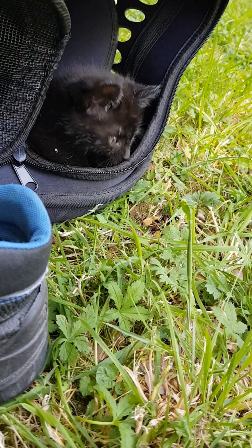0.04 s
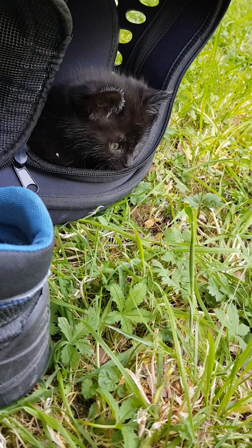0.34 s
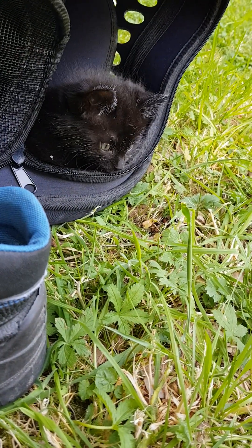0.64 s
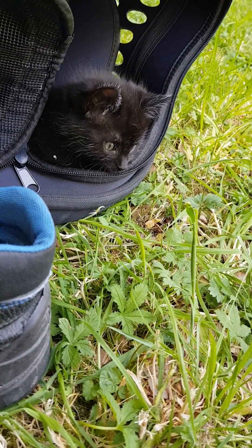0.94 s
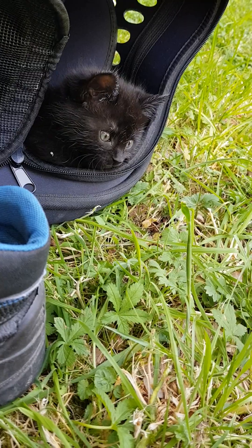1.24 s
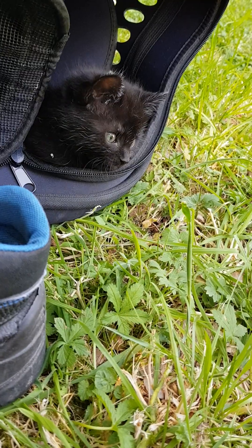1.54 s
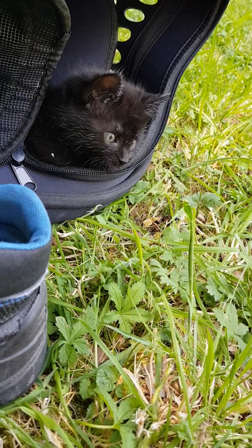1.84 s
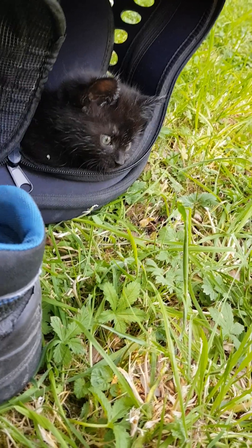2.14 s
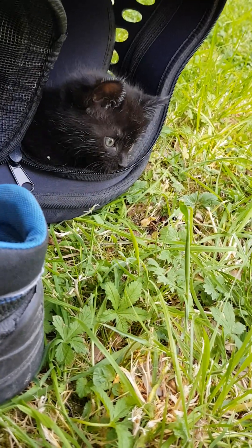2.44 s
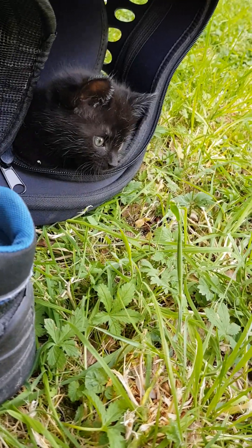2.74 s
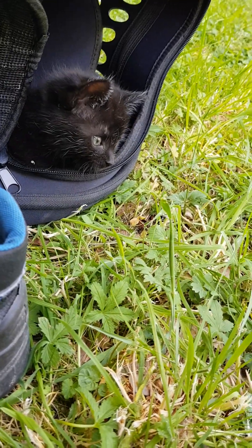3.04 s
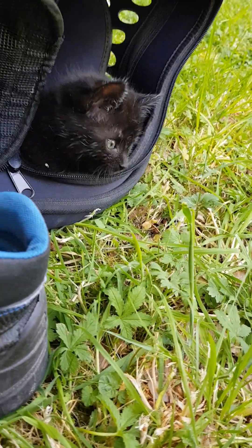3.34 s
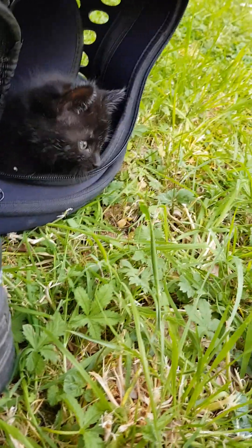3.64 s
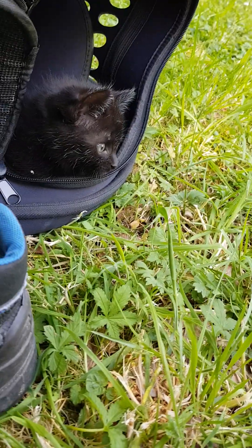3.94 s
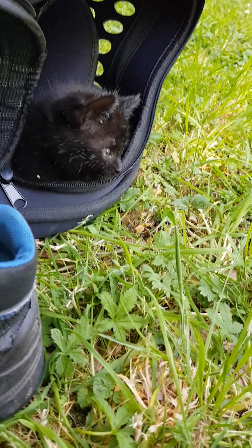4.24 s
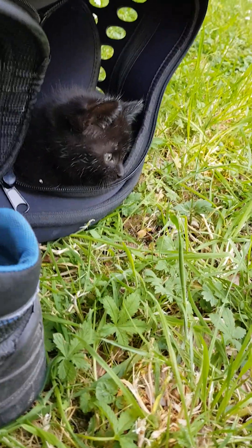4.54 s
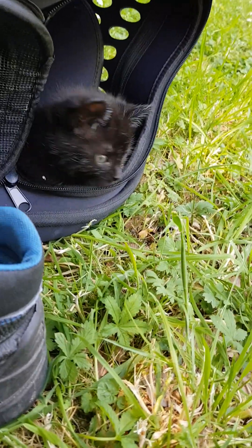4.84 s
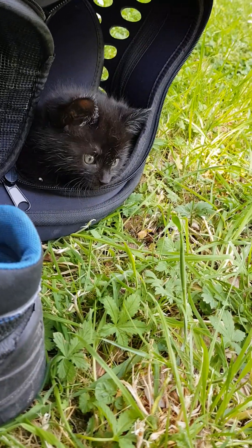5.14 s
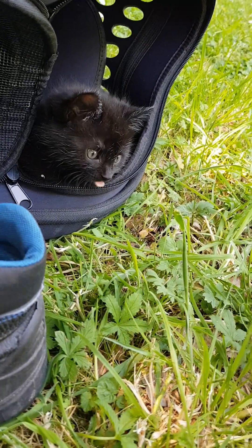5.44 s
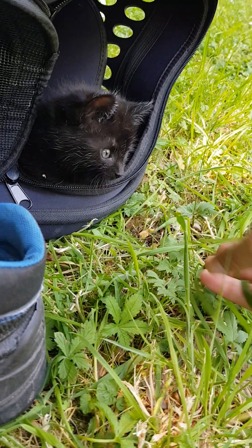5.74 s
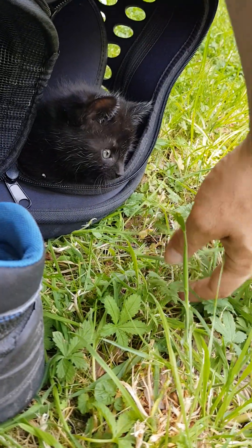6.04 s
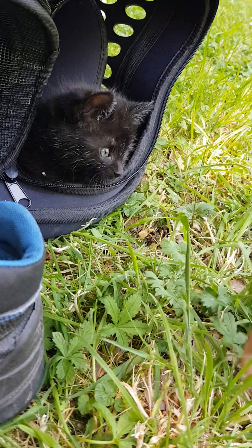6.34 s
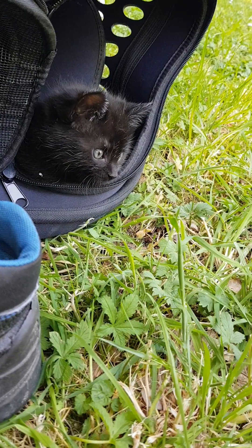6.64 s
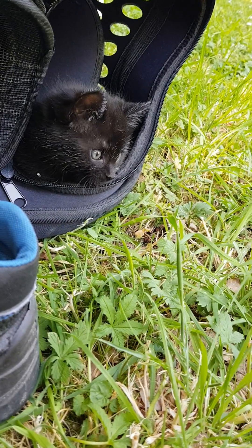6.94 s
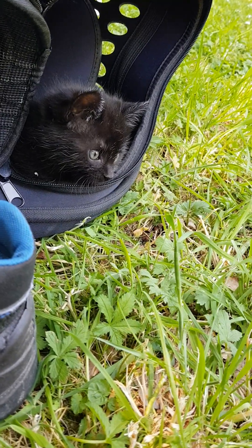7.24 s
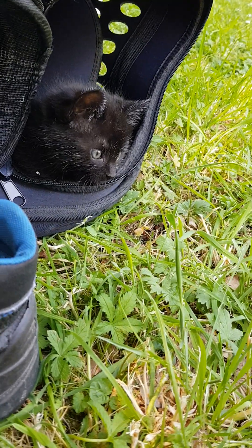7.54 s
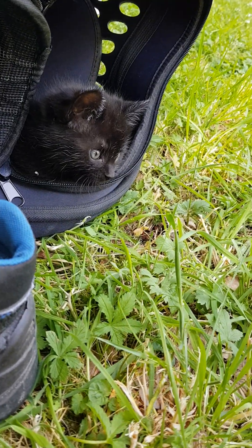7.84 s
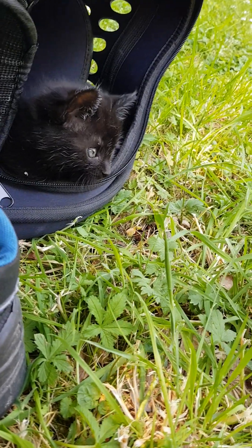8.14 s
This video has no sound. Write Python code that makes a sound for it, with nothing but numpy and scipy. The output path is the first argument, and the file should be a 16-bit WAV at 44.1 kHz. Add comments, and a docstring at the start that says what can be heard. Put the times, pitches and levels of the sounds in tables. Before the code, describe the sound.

Outdoors, a quiet low rumble runs steadily, with an engine idling far away and a light hum. Close to the microphone, mostly on the left, fingers rustle and scrape softly on the phone, with a few dull bumps and small taps. A bird chirps very faintly in the distance. At the end the grip shifts and the case creaks in a quick run of sharper clicks.

```python
"""An engine idles far off across a lawn, heard as the low harmonics of its firing cycle.
Close by, fingers on a hand-held phone rustle and scrape by stick-slip friction near the left
microphone port. Taps ring the case, the hand bumps it, and at the end the grip shifts and the
case creaks in a quick run of clicks. A faint bird sings, its notes scattered by trees, over
mains hum, outdoor rumble, stirring air and microphone hiss."""
import sys
import numpy as np
from scipy import signal
from scipy.fft import rfft, irfft, next_fast_len
from scipy.io import wavfile
from scipy.ndimage import uniform_filter1d

SR = 44100
rng = np.random.default_rng(int(sys.argv[2]) if len(sys.argv) > 2 else 0)


def store_wav(level_fs):
    """Save 16-bit WAV to argv[1]."""
    pcm = np.round(np.clip(np.atleast_2d(level_fs), -1, 1) * 32767)
    wavfile.write(sys.argv[1], SR, pcm.T.astype(np.int16))


N = 370881
T = np.arange(N) / SR

# Levels in the tables are relative; each source applies its own gains.
# Engine harmonics. Each row: multiple of the cycle rate, level in dB.
ENGINE_HARMONICS = [(4, -2.5), (5, -30.5), (6, -0.5), (9, -20), (10, -22), (12, -16), (14, -36.5),
                    (15, -31.5), (16, -30), (18, -27.5)]
# How loudly the engine carries. Each row: time in seconds, level in dB.
ENGINE_LEVEL = [(0.0, -47.5), (1.71, -48), (2.32, -41), (2.67, -40), (3.35, -49), (3.93, -44), (4.5, -49),
                (5.83, -49.5), (6.21, -45.5), (7.61, -52), (7.94, -62), (8.41, -61)]
# Finger strokes. Each row: centre in seconds, fizz level in dB, length in seconds.
FINGER_STROKES = [(.067, -65.5, .07), (0.188, -64, .025), (.282, -69.5, 0.031), (1.104, -69.5, 0.041),
                  (1.463, -66, 0.064), (1.595, -63.5, .05), (1.678, -48, 0.0026), (1.69, -54.5, 0.038),
                  (1.77, -63, 0.069), (2.149, -58, 0.071), (2.397, -60.5, 0.041), (2.5, -63, 0.096),
                  (3.074, -57, 0.088), (3.845, -68, .12), (4.053, -54.5, 0.045), (4.274, -62, 0.19),
                  (4.546, -63, 0.072), (4.697, -55, 0.064), (4.89, -64.5, 0.2)]
# Friction spectra: skin fizz, stroke body, scrape. Each row: frequency in Hz, density in dB.
FIZZ_SPECTRUM = [(3000, -55), (7600, -32), (9000, -10.5), (11500, -0.5), (14000, 3), (16000, -2.5)]
BODY_SPECTRUM = [(300, 1), (720, 2), (1200, -7), (2000, -5), (2800, -4.5), (3700, -10), (5000, -11),
                 (6300, -23), (8000, -53)]
SCRAPE_SPECTRUM = [(300, 4), (600, 2.5), (860, -2.5), (1040, -7), (1220, -3.5), (1550, -8), (2050, -1),
                   (2400, -5), (2800, -5), (3250, -18), (3900, -11), (4600, -28), (7000, -38)]
# Slides on the case. Each row: centre in seconds, level in dB, length in seconds, squeak in Hz,
# left minus right in dB.
CASE_SCRAPES = [(0.026, -55, 0.11, 1555, 16), (0.114, -60, 0.11, 1865, 26), (3.117, -55, 0.09, 1390, 39),
                (3.228, -57, 0.05, 1390, 25), (5.377, -58.5, 0.036, 1340, 20),
                (6.886, -73.5, 0.077, 1230, 20), (7.406, -72, 0.053, 1320, 22),
                (7.629, -63, 0.066, 1210, 22), (7.742, -70, 0.05, 1320, 22)]
# Fingertip taps. Each row: start in seconds, peak in dB.
FINGER_TAPS = [(3.16, -42), (3.204, -42), (5.348, -46), (5.370, -26.5), (6.613, -33), (6.839, -47),
               (7.596, -40.5)]
# Creaks. Each row: start in seconds, peak of the first slip in dB, length in seconds.
GRIP_CREAKS = [(8.1814, -29, .004), (8.1935, -20, .004), (8.208, -32.5, .012), (8.252, -28.5, .004),
               (8.281, -31.5, .028), (8.32, -33.5, .02), (8.37, -42.5, .02), (8.401, -40.5, .004)]
# Case modes. Each row: frequency in Hz, base bandwidth in Hz, left level in dB, right level in dB.
CASE_MODES = [(780, 86, 2, -14), (1033, 157, 2.5, -2.5), (1296, 164, 10.5, -32), (1590, 37, -25, -28),
              (2215, 245, 6.5, -3), (2790, 110, -4.5, -32), (3370, 21, -12, -28), (4240, 83, -7.5, -15),
              (5000, 180, -12, -21)]
# Bumps. Each row: centre in seconds, peak in dB, frequency in Hz, length in seconds,
# left minus right in dB.
HAND_BUMPS = [(2.987, -28.5, 55, 0.027, 24), (5.055, -33.5, 68, 0.027, 15), (5.095, -30, 51.3, 0.011, 22),
              (7.425, -29.5, 70, 0.014, -24), (7.68, -43.5, 75.3, 0.079, 4.5)]
# Song. Each row: centre in seconds, level in dB, length in seconds, pitch in Hz, trill from 0 to 1.
BIRD_NOTES = [(1.758, -68, .02, 4800, 0.7), (3.82, -77, 0.063, 4200, .6), (4.18, -75, 0.063, 5180, 0.6),
              (4.532, -73, 0.056, 3780, .6), (4.69, -67, .04, 2710, 0.48), (4.88, -74, 0.048, 4400, 0.74),
              (5.71, -70, .05, 2767, 0.11), (6.33, -73.5, 0.06, 3460, 0.07), (6.49, -73, 0.1, 3790, 0.7),
              (6.97, -72.5, 0.044, 2620, 0.93), (7.19, -72, 0.057, 3450, 0.3),
              (7.38, -69.5, 0.065, 3437, 0.6), (7.52, -72, 0.078, 2830, 0.8), (7.8, -82.5, 0.21, 4500, .5)]
# Hum partials. Each row: frequency in Hz, level in dB.
HUM_PARTIALS = [(100.1, -61.5), (150, -60.5), (200.1, -59.5), (250.1, -86.5)]
# Spectra of outdoor rumble, air at the ports and hiss. Each row: frequency in Hz, density in dB.
RUMBLE_SPECTRUM = [(15, -42.5), (28, -19.5), (45, 2), (75, -1), (115, -4), (170, -6.5), (230, -9.5),
                   (300, -14), (400, -27), (650, -37), (1200, -64)]
AIR_SPECTRUM = [(15, -18.5), (35, -7.5), (55, 7), (100, 1.5), (200, -15), (320, -20), (600, -31.5),
                (1200, -55)]
HISS_SPECTRUM = [(300, 4), (1000, 3), (2500, -0.5), (4500, -6.5), (7000, -15.5), (8500, -31), (10000, -4),
                 (12000, 2.5), (16000, 4)]
# Envelopes of the rumble and the cupped hand's resonance. Each row: time in seconds, level in dB.
RUMBLE_LEVEL = [(0.0, -58.5), (0.3, -60.5), (4.22, -56), (4.71, -58), (8.41, -56.5)]
HOLLOW_LEVEL = [(0, -68), (1.35, -76.5), (1.65, -81.5), (2.5, -71.5), (3.7, -80), (4.2, -77), (5.2, -70.5),
                (5.55, -82), (7.6, -71), (8.41, -95)]

FAR_PAN_DB = 1.8  # left minus right
GRIP_HZ = 5530  # contact cut-off as the grip starts to shift


def engine(cycle_hz=17.47, gain_db=2, flutter_db=1.02, beat_s=1.262, crest_s=2.53):
    """Periodic firing makes a harmonic series; only low harmonics carry far, and the eighth beats."""
    phase = 2 * np.pi * np.cumsum(cycle_hz * (1 + .002 * drift(1.492))) / SR

    def harmonic(k):
        """Phase dispersion spreads the harmonics in time, so their sum hardly throbs."""
        return np.sin(k * phase + np.pi * k ** 2 / 8 + .31 * drift(7))

    partials = sum(undb(db + flutter_db * drift(2.64)) * harmonic(k) for k, db in ENGINE_HARMONICS)
    beat = np.cos(2 * np.pi * (T - crest_s) / beat_s)
    eighth = undb(-52 + 4 * beat) * harmonic(8)
    return far(partials * undb(curve(ENGINE_LEVEL) + gain_db) + eighth)


def rustle(gain_db=-3, flicker_db=2, rest_fizz_db=-75, rest_body_db=-83, body_slope=.77):
    """Skin friction: dense micro-slips merge into noise; resting fingers fidget between strokes."""
    fidget = undb(3 * drift(8))
    fizz_power = (undb(rest_fizz_db) * fidget) ** 2
    body = undb(rest_body_db) * fidget
    for centre, db, length in FINGER_STROKES:
        stroke = bell(centre, length)
        fizz_power += (undb(db) * stroke) ** 2
        body += undb(-68.5 + body_slope * (db + 62)) * stroke  # grows more slowly than the fizz
    grain = slips(per_second=9000, spread_db=3.5)
    friction = np.sqrt(fizz_power) * colour(grain, FIZZ_SPECTRUM) + body * colour(grain, BODY_SPECTRUM)
    return friction * undb(gain_db + flicker_db * drift(70)) * pan(24)


def scrapes(grain_db=-4, jerk_db=1.5, squeak_db=-6):
    """Coarser stick-slip on the case drives a resonant squeak whose pitch depends on the grip."""
    grain = colour(slips(per_second=4000, spread_db=2.5), SCRAPE_SPECTRUM)
    grain *= undb(grain_db + jerk_db * drift(90))
    out = np.zeros((2, N))
    for centre, db, length, hz, left_db in CASE_SCRAPES:
        squeak = resonate(grain, hz, width_hz=120) * undb(squeak_db)
        out += (grain + squeak) * undb(db) * bell(centre, length) * pan(left_db)
    return out


def taps(cutoff_hz=1970, reference_db=-32.5, db_per_octave=27):
    """Impact: a fingertip excites and damps the case, brighter when firmer; a faint rattle follows."""
    hits = [(start, db, cutoff_hz * 2 ** ((db - reference_db) / db_per_octave))
            for start, db in FINGER_TAPS]
    ring = ring_case(hits, damping=1.83, thud_db=4.5, tick_db=-28, edge_db=-10, right_db=-5.5)
    return ring + undb(-11) * scatter(ring, t60=.37)


def creaks(slip_gap_s=.0075, slip_fade_db=-2, settled_hz=1440, settle_s=.035):
    """Stick-slip: runs of weakening slips ring the case freely, duller as the grip settles."""
    hits = []
    for start, db, length in GRIP_CREAKS:
        elapsed = start - GRIP_CREAKS[0][0]
        cutoff_hz = settled_hz + (GRIP_HZ - settled_hz) * np.exp(-elapsed / settle_s)
        for k, delay in enumerate(np.arange(0, length, slip_gap_s)):
            jitter = min(k, 1) * .0006 * rng.standard_normal()
            hits.append((min(start + delay + jitter, T[-1]), db + k * slip_fade_db, cutoff_hz))
    ring = ring_case(hits, damping=.74, thud_db=-11, tick_db=-25.5, edge_db=-15, right_db=-.5)
    return ring + undb(-12) * scatter(ring, t60=.3)


def ring_case(hits, damping, thud_db, tick_db, edge_db, right_db, null_hz=1760, null_width_hz=390):
    """Modal decay: each hit rings the case; soft contact weakens upper modes, hard contact ticks."""
    t = np.arange(SR // 16) / SR
    hz, width, left, right = np.transpose(CASE_MODES)
    gains = undb([left, right + right_db]) * width
    attack = 1 - np.exp(-t / .0005)
    decay = np.exp(-np.pi * np.outer(width * damping, t))
    skin = signal.butter(4, 10000, "high", fs=SR, output="sos")
    edge = signal.butter(4, [2500, 5200], "band", fs=SR, output="sos")  # a hard edge wakes upper modes
    null = signal.iirnotch(null_hz, null_hz / null_width_hz, fs=SR)  # the case hardly radiates here
    out = np.zeros((2, N + len(t)))
    for start, db, cutoff_hz in hits:
        detuned_hz = hz * (1 + .022 * rng.standard_normal(len(hz)))
        modes = attack * decay * np.cos(2 * np.pi * np.outer(detuned_hz, t))
        modes[0] *= undb(thud_db)
        radiated = signal.lfilter(*null, gains @ modes)
        contact = signal.butter(4, [350, np.clip(cutoff_hz, 600, 12000)], "band", fs=SR, output="sos")
        ring = signal.sosfilt(contact, radiated) + undb(edge_db) * signal.sosfilt(edge, radiated)
        ring[1] = np.roll(ring[1], SR // 10000)  # the right port is further from the fingers
        tick = signal.sosfilt(skin, rng.standard_normal(len(t))) * np.exp(-t / .0058)
        tick_gain = undb(tick_db) * (cutoff_hz / GRIP_HZ) ** 2 * pan(20)
        i = int(start * SR)
        out[:, i:i + len(t)] += undb(db) * (ring / np.abs(ring).max() + tick_gain * tick)
    return out[:, :N]


def bumps():
    """Forced motion: each nudge of the hand gives the phone a brief pulse of bass."""
    return sum(undb(db) * bell(centre, length) * np.cos(2 * np.pi * hz * (T - centre)) * pan(left_db)
               for centre, db, hz, length, left_db in HAND_BUMPS)


def bird(warble_depth=.06, fall_octaves_per_s=1.3):
    """Frequency modulation turns whistles into falling trills; scattering by trees blurs them."""
    song = np.zeros(N)
    warble = drift(350)
    for centre, db, length, pitch_hz, trill in BIRD_NOTES:
        note = np.abs(T - centre) < 2 * length
        glide = 2 ** (-trill * fall_octaves_per_s * (T[note] - centre))
        hz = pitch_hz * glide * (1 + trill * warble_depth * warble[note])
        song[note] += undb(db) * bell(centre, length)[note] * np.sin(2 * np.pi * np.cumsum(hz) / SR)
    return scatter(song, t60=.33) * pan(13)


def mains_hum(flutter_db=.9):
    """Alternating current hums near harmonics of 50 Hz, each wavering slightly in level."""
    partials = sum(undb(db + flutter_db * drift(2.275)) * np.sin(2 * np.pi * (hz * T + rng.random()))
                   for hz, db in HUM_PARTIALS)
    return far(np.sqrt(2) * partials)


def background(rumble_db=5, air_db=-56, hiss_db=-68, hollow_hz=640):
    """Rumble is coherent at both ports, air and hiss are not; the cupped hand resonates at the left."""
    rumble = colour(rng.standard_normal(N), RUMBLE_SPECTRUM) * undb(curve(RUMBLE_LEVEL) + rumble_db)
    air = colour(rng.standard_normal((2, N)), AIR_SPECTRUM) * undb(air_db)
    hiss = colour(rng.standard_normal((2, N)), HISS_SPECTRUM) * undb(hiss_db)
    cavity = resonate(rng.standard_normal(N), hollow_hz, width_hz=170)
    hollow = resonate(cavity, hollow_hz, width_hz=340) * undb(curve(HOLLOW_LEVEL))
    return far(rumble) + air * pan(3.2) + hiss * pan(FAR_PAN_DB) + hollow * pan(46)


def slips(per_second, spread_db):
    """A Poisson train of tiny slips, a few much stronger than the rest."""
    hit = rng.random(N) < per_second / SR
    sign = rng.choice([-1, 1], N)
    strength = undb(spread_db * np.minimum(rng.exponential(size=N), 4))
    return unit(hit * sign * strength)


def resonate(x, hz, width_hz):
    """A single resonance selects one band, at unit rms."""
    return unit(signal.lfilter(*signal.iirpeak(hz, hz / width_hz, fs=SR), x))


def scatter(x, t60):
    """Dense random echoes form a tail at each port, decaying at 60 dB per t60 seconds."""
    t = np.arange(SR // 4) / SR
    echoes = rng.standard_normal((2, len(t))) * np.exp(-np.log(1000) * t / t60)
    return signal.fftconvolve(np.atleast_2d(x), echoes / np.linalg.norm(echoes[0]), axes=1)[:, :N]


def far(x, lag_samples=23):
    """Path difference: distant sound reaches the left port first, a little louder."""
    return np.array([x, np.roll(x, lag_samples)]) * pan(FAR_PAN_DB)


def pan(left_db):
    """Constant-power gains of the two ports for a left-minus-right level."""
    return unit(undb([[left_db], [0]]))


def colour(x, spectrum):
    """Spectral shaping by (Hz, dB) points, at unit rms."""
    hz, db = np.transpose(spectrum)
    size = next_fast_len(N)
    bin_hz = np.maximum(np.arange(size // 2 + 1) * SR / size, 1)
    gain = undb(np.interp(np.log(bin_hz), np.log(hz), db))
    return unit(irfft(rfft(x, size) * gain, size)[..., :N])


def drift(rate_hz):
    """Smoothed random steps, at unit rms."""
    hold = max(int(SR / rate_hz), 1)
    steps = np.repeat(rng.standard_normal(N // hold + 1), hold)
    return unit(uniform_filter1d(uniform_filter1d(steps, hold), hold)[:N])


def bell(centre, length):
    """A Gaussian envelope; its length spans two standard deviations."""
    return np.exp(-.5 * np.minimum((2 * (T - centre) / length) ** 2, 100))


def curve(rows):
    """Linear interpolation of (seconds, value) rows."""
    return np.interp(T, *np.transpose(rows))


def undb(db):
    """Decibels to amplitude gain."""
    return 10 ** (np.asarray(db) / 20)


def unit(x):
    """Normalisation to unit rms."""
    return x / np.sqrt(np.mean(x ** 2))


def scene():
    """Superposition of the surroundings and the close handling."""
    surroundings = engine() + mains_hum() + background() + bird()
    return surroundings + rustle() + scrapes() + taps() + creaks() + bumps()


def record(dry, cutoff_hz=15850):
    """Band limiting: the phone cuts the top treble steeply."""
    return signal.sosfilt(signal.ellip(12, .1, 80, cutoff_hz, fs=SR, output="sos"), dry)


dry = scene()
out = record(dry)
store_wav(out)
```